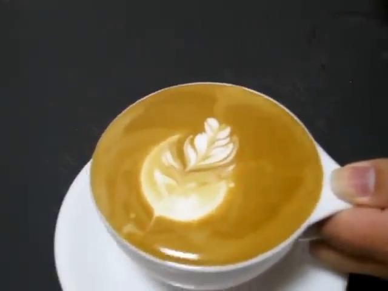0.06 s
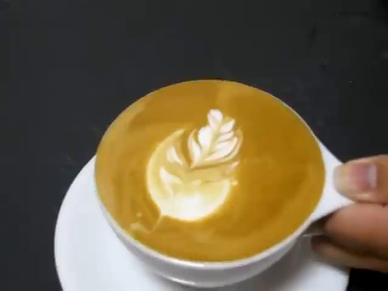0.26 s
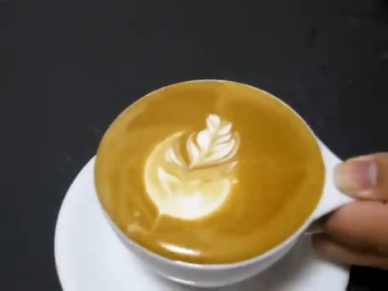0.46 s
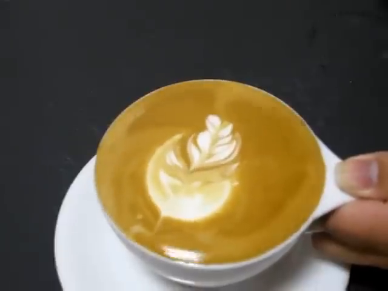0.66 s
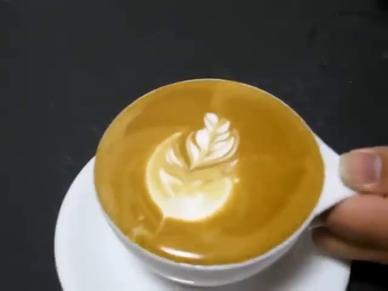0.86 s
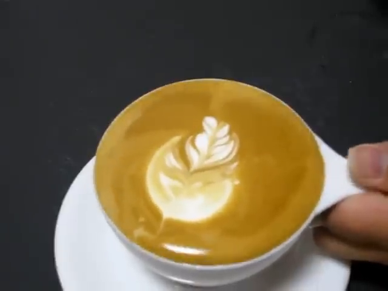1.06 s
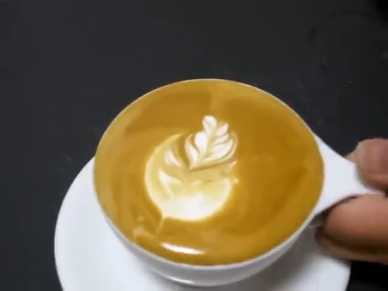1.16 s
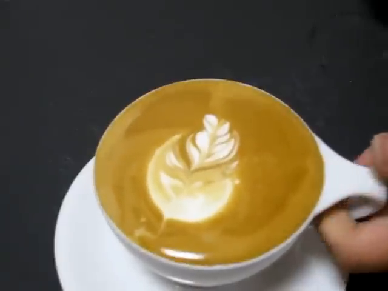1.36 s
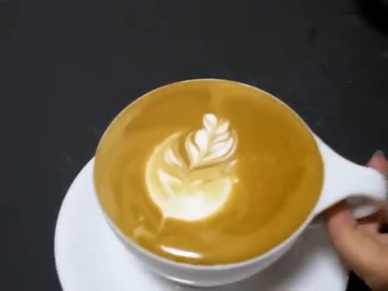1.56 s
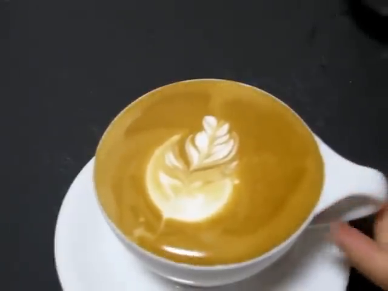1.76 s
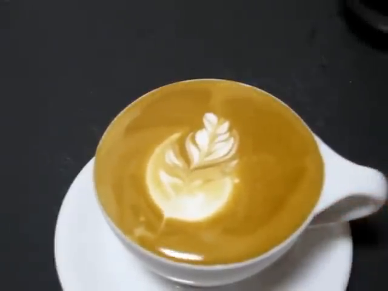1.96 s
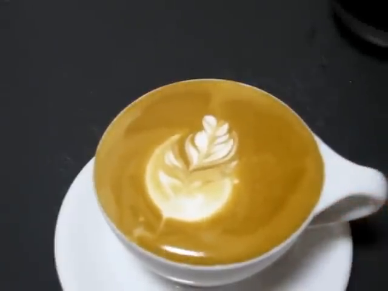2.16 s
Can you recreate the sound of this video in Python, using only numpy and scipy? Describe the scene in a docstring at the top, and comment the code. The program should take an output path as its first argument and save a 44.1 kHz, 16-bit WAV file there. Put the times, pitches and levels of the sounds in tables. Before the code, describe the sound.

A ceramic cup lands on its saucer with one sharp clack and a brief ring.

```python
"""Light taps and a short slide, then one hard clack: a full ceramic cup lands on its saucer.
Each contact rings the damped saucer, the table top and the cup wall; the cup rings on until the
fingers choke it. The hand lets go of the handle with faint ticks and a rustle.
Small, quiet room: short reverb, steady noise, faint appliance tones."""
import sys
import numpy as np
from scipy import signal
from scipy.fft import rfft, irfft
from scipy.io import wavfile

SR = 44100
rng = np.random.default_rng(int(sys.argv[2]) if len(sys.argv) > 2 else 0)


def unload_audio(sound):
    """Save the sound as a 16-bit wav file, at the path given as the first command line argument."""
    columns = np.transpose(np.atleast_2d(sound))
    # keep every value between -1 and 1, then stretch to whole-number steps
    steps = np.round(np.clip(columns, -1, 1) * 32767)
    wavfile.write(sys.argv[1], SR, steps.astype(np.int16))


N = 97020
TIME_S = np.arange(N) / SR

# cup foot on saucer: t/s, level/dB, hardness as low-pass f/Hz
FOOT_CONTACTS = [(0.0783, -32, 830), (0.097, -30, 610), (0.1075, -29, 750), (0.1295, -31, 815),
                 (0.1325, -27, 596), (0.1362, -13, 950), (0.1414, -14, 750), (0.1481, -28, 1000),
                 (0.1780, -18, 534), (0.1921, -21, 1100), (0.1956, -12, 1120), (0.1971, -14, 1300),
                 (0.2000, -1, 15000)]
# saucer, damped by the table: f/Hz, level/dB, t60/s
SAUCER_MODES = [(742, -7, 0.015), (1253, -14, 0.014), (1490, -3, 0.0063), (2225, -4, 0.0075),
                (2665, -19, 0.01), (3050, -32, 0.02), (4680, -20, 0.0082), (5610, -19, 0.011),
                (9300, -17, .003)]
# cup wall: f/Hz, level/dB, t60/s
CUP_MODES = [(1881, -34.5, 1), (1940, -25, 0.1), (3579, -28.5, 0.15), (3634, -22, 0.2), (3690, -38, .15),
             (5747, -36, 0.23), (5817, -35.5, 0.11), (5810, -39, 0.1), (7720, -64, 0.29), (9345, -44, .16),
             (12985, -51, 0.25), (13055, -47, 0.24), (14000, -50, .18)]
# table top: f/Hz, level/dB, t60/s
TABLE_MODES = [(325, -26.5, 0.12), (355, -30.5, 0.14), (636.3, -23.5, 0.18), (677, -26.5, .1),
               (851, -28.5, 0.21), (941, -27.5, 0.12), (1275, -22, 0.14), (1455, -29.5, 0.082)]
# finger slips on the handle: t/s, level/dB, decay/s, low-pass f/Hz
FINGER_TICKS = [(1.039, -56, 0.031, 8900), (1.0442, -42.5, 0.0079, 5000), (1.05, -45, 0.0011, 2000),
                (1.054, -50, 0.02, 8000), (1.259, -57.5, 0.02, 1400), (1.767, -50.5, 0.014, 2520)]
# hand rustle envelope: t/s, level/dB
RUSTLE_ENVELOPE = [(0, -68), (.12, -61.5), (.4, -78), (.66, -64), (.77, -56.5), (.92, -68.5), (1.15, -71),
                   (1.26, -68), (1.4, -94), (1.48, -66.5), (1.68, -64), (1.88, -66), (1.96, -59.5),
                   (2.08, -59.5), (2.2, -55)]
# hand rustle spectrum: f/Hz, relative density/dB
RUSTLE_SPECTRUM = [(100, 3), (350, -5.5), (800, 0.5), (2000, -2), (4000, -3.5), (8000, -13), (16000, -27)]
# reflections off near surfaces: delay/s, level/dB
NEAR_ECHOES = [(.0036, -22.5), (0.0235, -52), (0.0304, -19), (0.038, -19.5), (0.065, -37)]
# diffuse reverb: f/Hz, level/dB, t60/s
REVERB_BANDS = [(201, -16, .17), (316, 0.5, 0.14), (484, -5, 0.12), (710, -1.5, 0.16), (1300, -13, 0.18),
                (1900, -7, 0.14), (2580, -10.5, 0.18), (3300, -2.5, 0.12), (4480, -3.5, 0.23),
                (8000, -9, .18), (15000, -18, .17)]
# room noise spectrum: f/Hz, relative density/dB
AIR_SPECTRUM = [(12, -24), (20, 0), (98, -4), (145, -2.5), (247, -5), (345, -2.5), (375, -5.5), (539, -4.5),
                (1050, -8), (1280, -9.5), (2720, -14), (8090, -18.5), (15800, -25.5)]
# appliance tones: f/Hz, level/dB
APPLIANCE_TONES = [(538.3, -71), (4102, -76), (8053, -75), (8253, -81), (11806, -81), (15735, -116)]


def saucer(force):
    """Clack: each push and its quick rebound ring the saucer."""
    rebound_s, rebound_db = .00076, -2
    rebound = from_db(rebound_db) * delayed(force, rebound_s)
    clack = ring(force + rebound, SAUCER_MODES)
    return cut(cut(clack, 5560, "low"), 468, "high", order=3)


def contact_force():
    """One push per touch; softer is duller. Bodies this small radiate no bass."""
    impulse = 1.0 * (TIME_S == 0)
    pushes = sum(from_db(db) * cut(delayed(impulse, start_s), hardness_hz, "low", order=3)
                 for start_s, db, hardness_hz in FOOT_CONTACTS)
    return cut(pushes, 310, "high", order=6)


def cup(force):
    """Clink: pushes and foot friction ring the wall until the grip chokes it. The slide sings faintly."""
    slide_start_s, slide_end_s, release_s = .11, .195, .0044
    friction_db, squeak_db, squeak_hz = -47, -47.5, 3601
    grip_s, grip_db_per_s = .58, 73
    rise = np.clip((TIME_S - slide_start_s) / (slide_end_s - slide_start_s), 0, 1)
    pressure = rise * np.clip((slide_end_s - TIME_S) / release_s, 0, 1)
    hiss = cut(cut(rng.standard_normal(N), 5000, "high", order=4), 7000, "low", order=1)
    friction = from_db(friction_db) * pressure * hiss
    squeak = from_db(squeak_db) * pressure * np.sin(2 * np.pi * squeak_hz * TIME_S)
    choke = from_db(-grip_db_per_s * np.maximum(TIME_S - grip_s, 0))
    return squeak + ring(force + friction, CUP_MODES) * choke


def table_top(force):
    """Hollow knock: the same pushes ring the table."""
    return ring(force, TABLE_MODES)


def fingers():
    """Rustle of the moving hand; short slips of skin on the handle."""
    out = from_db(np.interp(TIME_S, *np.transpose(RUSTLE_ENVELOPE))) * noise(RUSTLE_SPECTRUM)
    for start_s, db, decay_s, top_hz in FINGER_TICKS:
        slip = rms_one(cut(cut(rng.standard_normal(N), top_hz, "low"), 1190, "high", order=1))
        out += from_db(db) * slip * delayed(np.exp(-TIME_S / decay_s), start_s)
    return out


def echoes(x):
    """Dull reflections off near surfaces."""
    reflections = sum(from_db(db) * delayed(x, delay_s) for delay_s, db in NEAR_ECHOES)
    return cut(reflections, 3190, "low")


def reverb(x):
    """Dense reflections hold briefly, then decay band by band."""
    onset_s, hold_s = .0033, .019
    edges_hz = np.geomspace(100, 16000, 17)
    bins_hz = np.fft.rfftfreq(N, 1 / SR)
    white = rfft(rng.standard_normal(N))
    response = np.zeros(N)
    for low_hz, high_hz in zip(edges_hz, edges_hz[1:]):
        centre_hz = np.sqrt(low_hz * high_hz)
        t60_s = at_hz(REVERB_BANDS, centre_hz, column=2)
        fade = from_db(-60 * np.maximum(TIME_S - hold_s, 0) / t60_s)
        band = irfft(white * (bins_hz >= low_hz) * (bins_hz < high_hz), N) * fade
        unity_gain_band = rms_one(band) * np.sqrt(2 * (high_hz - low_hz) / SR / N)
        response += from_db(at_hz(REVERB_BANDS, centre_hz)) * unity_gain_band
    return signal.fftconvolve(x, delayed(response, onset_s))[:N]


def background():
    """Steady room noise; faint appliance tones wavering in pitch."""
    air_db, waver_rms_hz = -54.5, 2.62
    out = from_db(air_db) * noise(AIR_SPECTRUM)
    for hz, db in APPLIANCE_TONES:
        waver_hz = waver_rms_hz * rms_one(cut(rng.standard_normal(N), 19, "low"))
        phase_rad = 2 * np.pi * np.cumsum(hz + waver_hz) / SR
        out += from_db(db) * np.sqrt(2) * np.sin(phase_rad)
    return out


def ring(force, modes):
    """Resonator bank: an impulse starts one decaying sine per mode."""
    out = np.zeros(N)
    for hz, db, t60_s in modes:
        radius = from_db(-60 / (t60_s * SR))
        step_rad = 2 * np.pi * hz / SR
        feedback = [1, -2 * radius * np.cos(step_rad), radius * radius]
        out += from_db(db) * signal.lfilter([0, np.sin(step_rad)], feedback, force + 1e-18)
    return out


def noise(spectrum):
    """Shaped noise, rms 1."""
    gain = from_db(at_hz(spectrum, np.fft.rfftfreq(N, 1 / SR)))
    return rms_one(irfft(rfft(rng.standard_normal(N)) * gain, N))


def cut(x, hz, kind, order=2):
    """Causal low- or high-pass."""
    return signal.sosfilt(signal.butter(order, hz, kind, fs=SR, output="sos"), x + 1e-18)


def at_hz(table, hz, column=1):
    """Interpolate a column over log frequency."""
    rows = np.array(table)
    return np.interp(np.log(hz + 1e-9), np.log(rows[:, 0]), rows[:, column])


def delayed(x, delay_s):
    """Delay, trimmed to N samples."""
    return np.concatenate([np.zeros(int(delay_s * SR)), x])[:N]


def from_db(db):
    """dB to gain."""
    return 10 ** (np.asarray(db) / 20)


def rms_one(x):
    """Scale to rms 1."""
    return x / np.sqrt(np.mean(x ** 2) + 1e-20)


def scene():
    """Mono mix: clack, knock, clink, reflections, hand, room noise."""
    clink_send_db = -10
    force = contact_force()
    clack = saucer(force)
    clink = cup(-force)   # equal and opposite push
    reflections = echoes(clack) + reverb(clack + from_db(clink_send_db) * clink)
    return (clack + table_top(force) + clink + reflections + fingers() + background())[None]


def record(dry):
    """The clack just overloads the microphone: soft clip, then low-pass."""
    ceiling, cutoff_hz = 1.1, 15950
    limited = dry / (1 + (dry / ceiling) ** 6) ** (1 / 6)
    low_pass = signal.firwin(401, cutoff_hz, fs=SR, window="blackman")
    return signal.fftconvolve(limited, low_pass[None], mode="same")


dry = scene()
out = record(dry)
unload_audio(out)
```